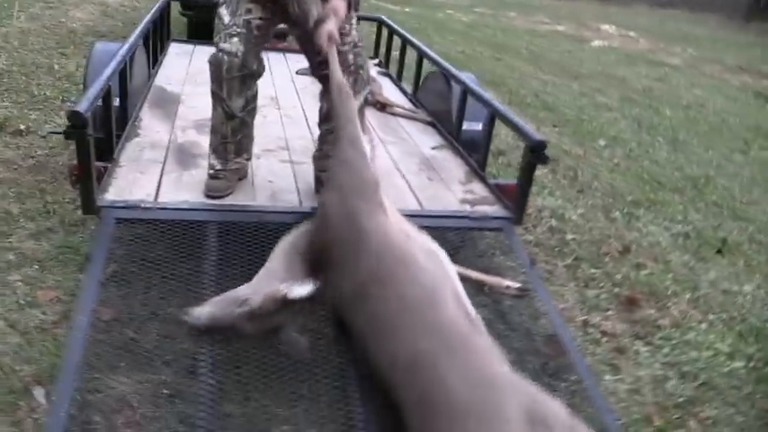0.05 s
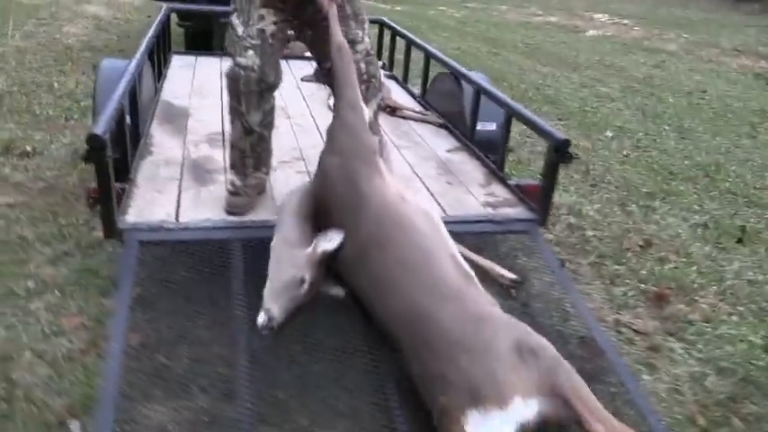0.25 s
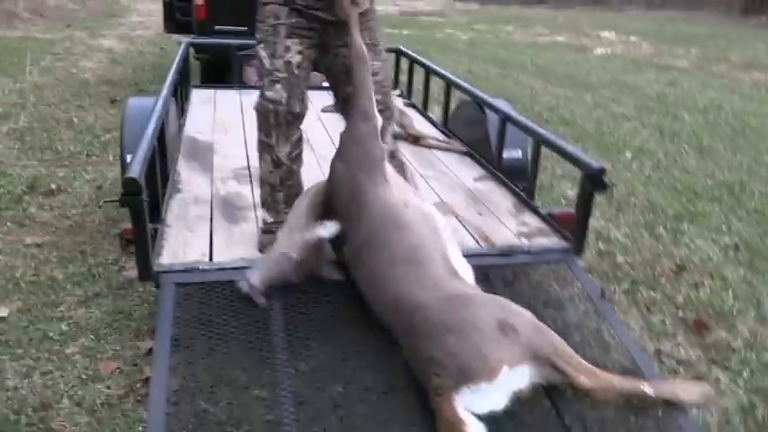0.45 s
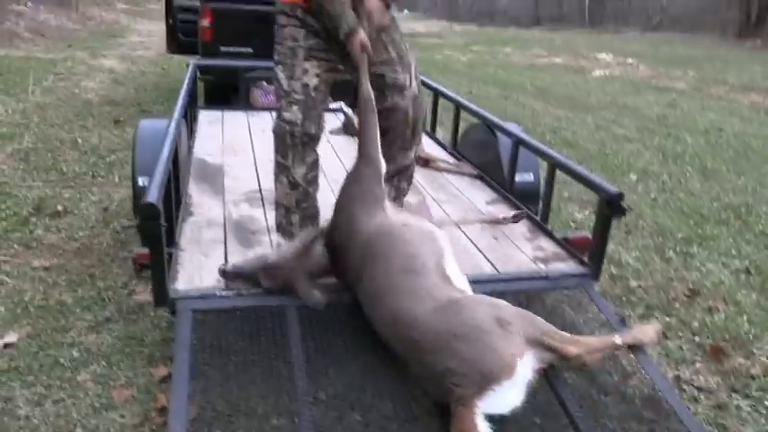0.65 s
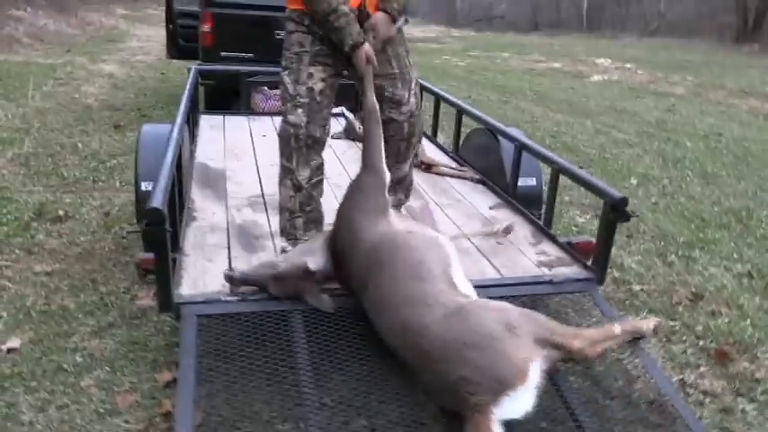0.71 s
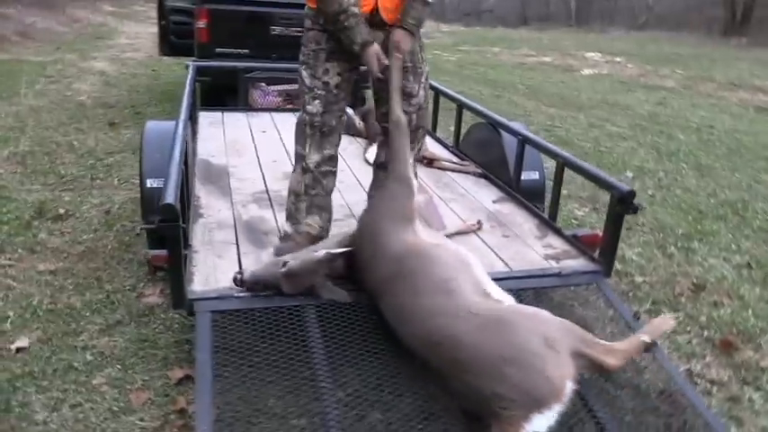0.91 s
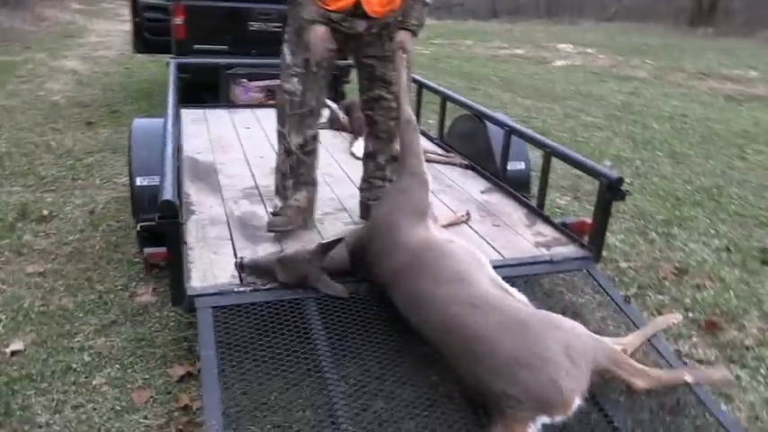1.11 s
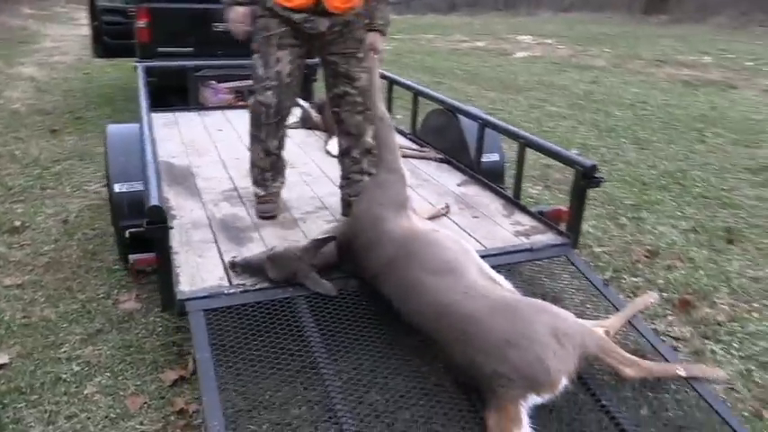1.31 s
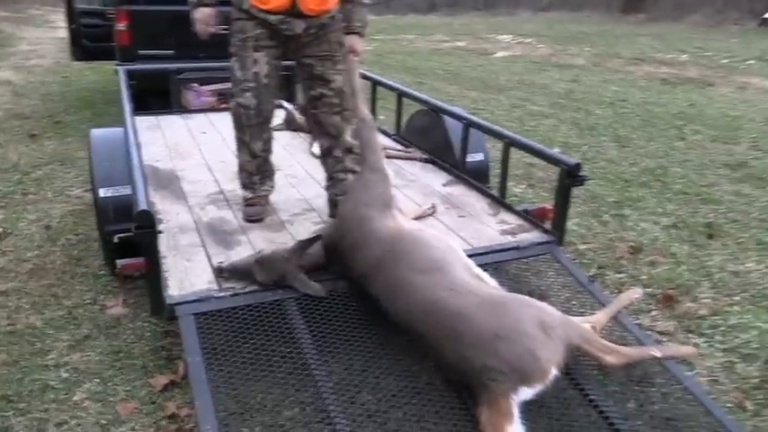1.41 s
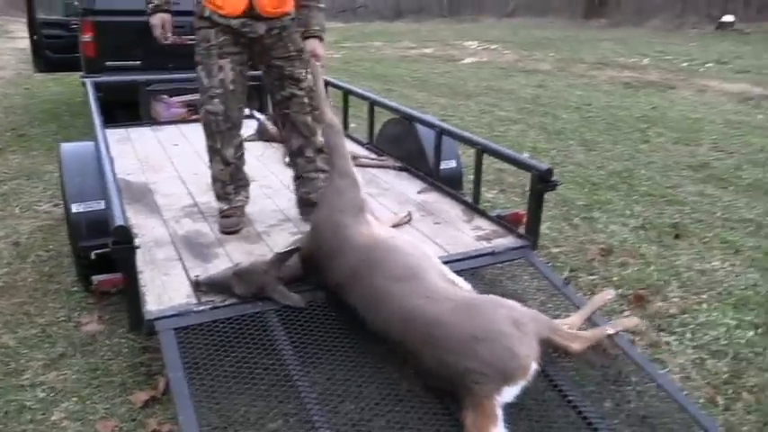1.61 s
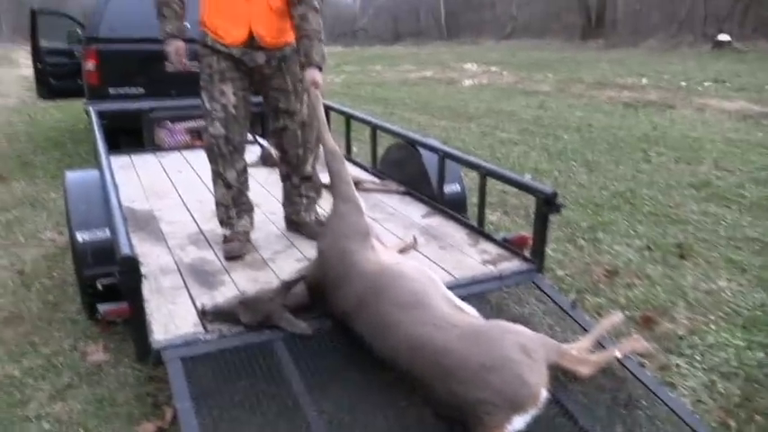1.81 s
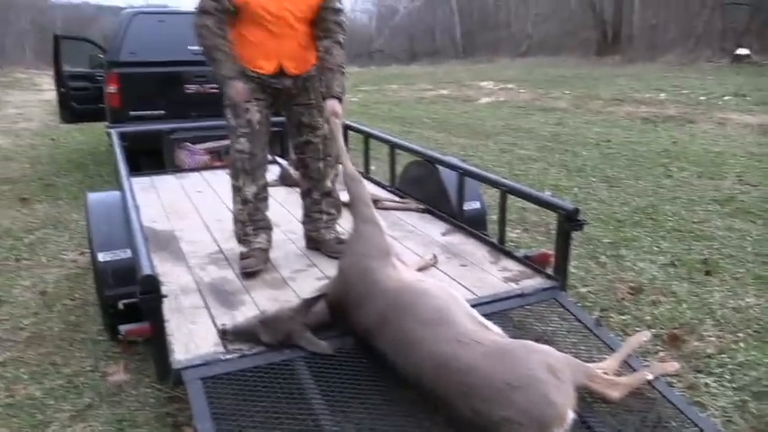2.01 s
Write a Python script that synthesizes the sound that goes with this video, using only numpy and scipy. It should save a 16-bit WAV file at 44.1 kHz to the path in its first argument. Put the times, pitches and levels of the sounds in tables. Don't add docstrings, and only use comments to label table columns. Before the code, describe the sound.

Heavy carcass scrapes up a steel mesh ramp and thumps onto a hollow wooden trailer deck

```python
import sys
import numpy as np
from scipy import signal
from scipy.fft import rfft, irfft
from scipy.io import wavfile
from scipy.ndimage import uniform_filter1d

SR = 44100
rng = np.random.default_rng(int(sys.argv[2]) if len(sys.argv) > 2 else 0)


def dump_mix(stems):
    frames = np.atleast_2d(stems).T
    limited = np.clip(frames, -1, 1)
    pcm = np.round(limited * 32767).astype(np.int16)
    wavfile.write(sys.argv[1], SR, pcm)


def linear_from_db(decibels):
    return 10 ** (np.asarray(decibels, float) / 20)


N = 92610


def unit(x):
    return x / np.sqrt(np.mean(x ** 2) + 1e-20)


def read(points, hz):
    f, value = np.transpose(points)
    return np.interp(np.log(hz + 1), np.log(f + 1), value)


def curve(table):
    s, db = np.transpose(table)
    return np.interp(np.arange(N) / SR, s, db)


def colour(x, spectrum):
    gain = linear_from_db(read(spectrum, np.fft.rfftfreq(len(x), 1 / SR)))
    return irfft(rfft(x) * gain, len(x))


def ring(x, hz, width_hz):
    r = np.exp(-np.pi * width_hz / SR)
    return 2 * signal.lfilter([1 - r], [1, -r * np.exp(2j * np.pi * hz / SR)], x).real


def soften(x, hz):
    return signal.sosfilt(signal.butter(4, min(hz, 20000), fs=SR, output="sos"), x)


def grit(per_s, spread_db):
    slips = rng.random(N) < per_s / SR
    size_db = spread_db * np.minimum(rng.exponential(1, N), 3)
    return unit(slips * linear_from_db(size_db) * rng.standard_normal(N))


def fading(size, spectrum, t60, share, order):
    overlap = order * 3 // 4
    f, t, z = signal.stft(rng.standard_normal(size), SR, nperseg=order, noverlap=overlap)
    fade_db = -60 * t / (share * read(t60, f)[:, None])
    z = z * linear_from_db(read(spectrum, f)[:, None] + fade_db)
    out = signal.istft(z, SR, nperseg=order, noverlap=overlap)[1][:size]
    return out / np.abs(out).max()


def add(mix, s, sound):
    part = mix[round(s * SR):][:len(sound)]
    part += sound[:len(part)]


# frequency in Hz, level in dB.
AIR_SPECTRUM = [(60, 20.5), (200, 4.5), (400, 1), (800, -25.5), (1600, -5), (3200, -26), (9000, -40),
                (16000, -25)]
# time in seconds, level in dB.
SWAY_LEVEL = [(0, -70), (.17, -56), (.22, -33), (.4, -29.5), (.5, -26.5), (.58, -37.5), (.72, -35.5),
              (.9, -47), (.97, -33.5), (1.05, -44), (1.3, -45.5), (1.45, -45), (1.52, -66), (1.6, -58),
              (1.7, -61), (1.9, -37), (2.1, -71)]
SWAY_MODES_HZ = [73, 114.7, 141.7]


def field():
    width_hz = 22.7
    hush, shake = rng.standard_normal((2, N))
    sway = unit(sum(ring(ring(shake, hz, width_hz), hz, width_hz) for hz in SWAY_MODES_HZ))
    return linear_from_db(-46) * unit(colour(hush, AIR_SPECTRUM)) + linear_from_db(curve(SWAY_LEVEL)) * sway


def catches():
    catch_db, catch_s = 2.5, 0.0053
    t = np.arange(N) / SR
    swell = sum((t > s) * np.exp(-abs(t - s) / catch_s) for s, _, _ in TICKS)
    return linear_from_db(catch_db * np.minimum(swell, 1))


# frequency in Hz, level in dB.
CLOTH_SPECTRUM = [(150, -8), (500, 0.5), (900, -5), (1600, -4), (3200, -2), (5500, -1.5), (9000, -3),
                  (15000, -9.5)]
# time in seconds, level in dB, tilt in dB per octave.
CLOTH_MOVES = [(.62, -45.5, -2.5), (.85, -41, -4), (1.13, -44, -4), (1.195, -43, -1.5), (1.23, -45.5, -3.5),
               (1.275, -41.5, -3), (1.295, -52, -5.5), (1.33, -50.5, -5.5), (1.345, -46.5, -1.5),
               (1.47, -41.5, -2.5), (1.57, -44, -1.5), (1.615, -41, -5), (1.635, -44.5, -1.5),
               (1.655, -54.5, -4), (1.745, -56, -5.5), (1.751, -34.5, -6.5), (1.791, -50.5, -11),
               (1.92, -51.5, -6)]


def rustle():
    fibres_per_s, spread_db, patch_db = 12000, 2.5, 1.38
    crackle = grit(fibres_per_s, spread_db) + rng.standard_normal(N)
    f, t, z = signal.stft(unit(colour(crackle, CLOTH_SPECTRUM)), SR, nperseg=256)
    s, db, tilt_db = np.transpose(CLOTH_MOVES)
    octaves = np.log2((f[:, None] + 200) / 4000)
    level_db = np.interp(t, s, db, left=-99) + np.interp(t, s, tilt_db) * octaves
    patches = uniform_filter1d(rng.standard_normal(z.shape), 8, 0)
    patches = unit(uniform_filter1d(patches, 8, 1))
    cloth = signal.istft(z * linear_from_db(level_db + patch_db * patches), SR, nperseg=256)[1][:N]
    return np.sqrt(catches()) * cloth


# time in seconds, level in dB.
SCUFF_LEVEL = [(1.219, -73), (1.223, -47), (1.235, -54), (1.255, -40), (1.27, -43), (1.283, -46),
               (1.29, -75)]
# frequency in Hz, width in Hz, level in dB.
SOLE_MODES = [(2200, 170, 0), (3420, 400, 1), (4200, 560, -1), (5140, 400, -15)]


def scuff():
    slips = grit(per_s=4000, spread_db=1.8) + 0.89 * rng.standard_normal(N)
    sole = sum(linear_from_db(db) * unit(ring(slips, hz, width_hz)) for hz, width_hz, db in SOLE_MODES)
    return linear_from_db(curve(SCUFF_LEVEL)) * sole


# start in seconds, level in dB, pitch in Hz, t60 in seconds.
SOFT_THUDS = [(.204, -12, 183, 0.045), (0.497, -9, 259, 0.083), (0.755, -9, 158, 0.22),
              (0.764, -6, 350, 0.12), (0.788, -18.5, 421, 0.078), (1.2199, -14, 242.3, 0.074),
              (0.642, -41, 294, 0.029), (1.391, -12, 165, 0.028), (1.747, -19.5, 133, 0.17),
              (1.821, -15, 120, 0.077)]


def thud(s, db, hz, t60_s):
    attack_s, sag_s, longest_t60_s = 0.0033, 0.0055, 0.14
    t = np.arange(SR // 4) / SR
    turn = 2 * np.pi * hz * (t + 0.0018 * (1 - np.exp(-t / sag_s)))
    fade_db = -60 * t / min(t60_s, longest_t60_s)
    tone = np.sin(turn) + 0.38 * np.sin(1.1 * turn)
    return s, linear_from_db(db + fade_db) * np.minimum(t / attack_s, 1) * tone


# start in seconds, level in dB, pitch in Hz, t60 in seconds.
PLANK_KNOCKS = [(.4965, -7, 399, 0.027), (.505, -7, 413, 0.038), (.513, -14.5, 436, 0.038),
                (0.6403, -6, 346.4, 0.07), (.6405, -14.5, 676, 0.056), (.648, -8.5, 500, 0.054),
                (0.6552, -4, 335, 0.024), (.655, -14, 670, 0.083), (0.6611, -16, 370, 0.015),
                (.665, -2, 500, 0.017), (0.831, -26.5, 144, 0.47), (.925, -36.5, 1600, 0.089),
                (1.285, -32, 508, 0.23), (0.519, -19.5, 200, 0.13), (0.557, -21.5, 1350, 0.021),
                (0.693, -12, 337, .04), (.704, -17, 380, 0.026), (0.762, -0.5, 498, 0.037),
                (0.7657, -1.5, 410, 0.023), (.784, -4.5, 386, 0.054), (.793, -1, 477, 0.04),
                (.808, -7.5, 390, 0.049), (0.816, -14, 377, 0.03), (1.2209, -8.5, 410, 0.021),
                (1.2215, -17.5, 631, 0.042), (1.226, -15, 462, 0.047), (1.234, -18.5, 323, 0.056),
                (1.252, -25, 470, 0.033), (1.265, -22, 440, 0.072), (1.7468, -5.5, 429, 0.033),
                (1.754, -4, 566, 0.099), (1.7601, -2.5, 584, 0.039), (1.770, -6, 401, 0.073),
                (1.79, -24.5, 786, 0.085), (1.82, -18.5, 650, 0.041)]


def knock(s, db, hz, t60_s):
    attack_s = 0.0013
    t = np.arange(SR // 3) / SR
    return s, -linear_from_db(db - 60 * t / t60_s) * np.minimum(t / attack_s, 1) * np.sin(2 * np.pi * hz * t)


# start in seconds, level in dB, ring in
# Hz.
TICKS = [(0.236, -19, 4160), (0.272, -40, 6800), (0.2843, -13.5, 4000), (0.3007, -18, 4500),
         (0.3065, -26, 4630), (0.3237, -14.5, 4080), (0.3672, -16.5, 6500), (0.371, -12, 4100),
         (0.3774, -17.5, 4000), (0.3944, -15, 4340), (0.432, -26, 4120), (0.5575, -33, 3000),
         (0.641, -29.5, 3400), (0.6846, -32, 4030), (0.719, -27.5, 3670), (0.7528, -14.5, 3630),
         (0.7655, -29, 14500), (0.7755, -30, 14500), (0.8635, -34.5, 5670), (1.4685, -27, 5600),
         (1.4996, -31, 6350), (1.5245, -30, 4450), (1.223, -35, 5270), (1.46, -35, 6260),
         (1.595, -31, 5950), (1.605, -36, 4600), (1.6168, -29, 5600)]
# frequency in Hz, level in dB.
SNAP_SPECTRUM = [(1500, -22), (4000, -9), (5500, -12), (7000, 0), (9000, -2), (11000, -12), (14000, -20)]


def tick(s, db, hz):
    snap_t60_s, ring_t60_s, ring_db, lead = 0.009, 0.025, -6, 56
    t = np.arange(1500) / SR
    hit = rng.standard_normal(len(t))
    snap = colour(np.roll(hit * linear_from_db(-60 * t / snap_t60_s), lead + 8), SNAP_SPECTRUM)
    snap = np.roll(snap, -8)
    bar = ring(np.roll(hit * linear_from_db(-60 * t / ring_t60_s), lead), hz, width_hz=450)
    sound = unit(snap) + linear_from_db(ring_db) * 2 * unit(bar)
    return s - lead / SR, linear_from_db(db) * sound / np.abs(sound).max()


# frequency in Hz, level in dB, t60 in seconds.
DECK_MODES = [(79, -43.5, 0.1), (128.5, 2.5, 0.36), (153, -5, .22), (225.7, 1.5, 0.34), (259, 0.5, 0.55),
              (264, -21, 0.067), (350, 6.5, 0.21), (418, 7, 0.16), (460.2, 2.5, 0.25), (513, -0.5, 0.19),
              (581, -9, 0.78), (590, -41, 0.065), (666, -30, 0.048), (810, -38, 0.34)]
# frequency in Hz, level in dB.
PLANK_SPECTRUM = [(50, -41), (150, 6), (300, -3.5), (500, 11), (700, -2), (1000, 2), (2000, -40),
                  (5000, -62)]
# frequency in Hz, t60 in seconds.
PLANK_DECAY = [(60, 0.067), (300, 0.37), (700, 0.14), (1500, 0.052), (4000, 0.085)]
# frequency in Hz, level in dB.
HUM_SPECTRUM = [(80, -0.5), (150, 13.5), (350, 6.5), (550, -2.5), (800, 5), (1500, -52), (3000, -54)]
# frequency in Hz, t60 in seconds.
HUM_DECAY = [(150, 0.48), (400, 0.81), (900, 0.35)]


def deck_ring(share):
    spread_db, detune, plank_db, hum_db = 0.5, 0.0284, -7, -14.5
    t = np.arange(SR // 2) / SR
    hz, db, t60_s = np.transpose(DECK_MODES)[:, :, None]
    spot = rng.standard_normal((2, len(DECK_MODES), 1))
    level = linear_from_db(db + spread_db * spot[0] - 60 * t / (share * t60_s))
    modes = (level * np.sin(2 * np.pi * hz * (1 + detune * spot[1]) * t)).sum(0)
    planks = fading(len(t), PLANK_SPECTRUM, PLANK_DECAY, share + 0.78, order=512)
    hum = fading(len(t), HUM_SPECTRUM, HUM_DECAY, 0.86, order=1024)
    return modes / np.abs(modes).max() + linear_from_db(plank_db) * planks + linear_from_db(hum_db) * hum


# time in seconds, scrape level in dB.
DRAG_SPEED = [(0.0, -51.5), (0.208, -34.5), (0.296, -26), (0.406, -27), (0.524, -42), (0.564, -45.5),
              (0.582, -44.5), (0.63, -56.5)]
# frequency in Hz, level in dB.
SCRAPE_SPECTRUM = [(50, -30), (100, -16), (250, -8), (450, -5.5), (900, -8), (1600, -9), (3000, -18.5),
                   (8000, -67)]
# frequency in Hz, width in Hz, level in dB.
BAR_MODES = [(1000, 70, -6), (1320, 72, -18), (1710, 130, -7.5), (4200, 250, -2), (6900, 560, -48)]
# frequency in Hz, level in dB.
HIDE_SPECTRUM = [(300, -28), (900, -10.5), (3200, -3), (5500, -5.5), (9000, -9), (15000, -19)]


def drag():
    slips_per_s, bumps_per_s, spread_db = 4000, 150, 2.5
    scrape_db, bars_db, jolt_db, hiss_db = 3, -8, 2.5, -23.5
    hiss_share = 0.31
    speed_db = curve(DRAG_SPEED)
    moving = np.clip((0.665 - np.arange(N) / SR) / 0.013, 0, 1)
    speed = linear_from_db(speed_db) * moving
    slips = grit(slips_per_s, spread_db) + rng.standard_normal(N)
    scrape = unit(colour(slips, SCRAPE_SPECTRUM))
    bars = sum(linear_from_db(db) * unit(ring(slips, hz, width_hz)) for hz, width_hz, db in BAR_MODES)
    bumps = speed * grit(bumps_per_s, spread_db)
    jolts = signal.fftconvolve(bumps, unit(deck_ring(0.51)))[:N] / np.sqrt(SR / 2)
    hiss = linear_from_db(hiss_db + hiss_share * speed_db) * moving * catches()
    hiss = hiss * unit(colour(slips[::-1], HIDE_SPECTRUM))
    return hiss + speed * (linear_from_db(scrape_db) * scrape + linear_from_db(bars_db) * bars) + linear_from_db(jolt_db) * jolts


# frequency in Hz, t60 in seconds.
CRACK_DECAY = [(500, 0.34), (2000, 0.12), (5000, 0.056), (14000, 0.015)]
# frequency in Hz, width in Hz, level in dB.
RAIL_MODES = [(994, 41, -21), (1274, 110, -8), (1600, 57, 2), (1740, 180, -0.5), (2810, 210, -0.5),
              (3400, 380, -7)]
# start in seconds, level in dB, crack level in dB,
# upper edge of the crack in Hz, ring length as a share.
DECK_BLOWS = [(0.361, -10.5, -20, 2000, 0.21), (0.496, -10.5, -39, 1000, 0.47),
              (.514, -16, -40, 1010, 0.64), (0.536, -22.5, -28.5, 1470, 1), (0.6401, -11, -17, 1500, 0.15),
              (0.656, -21, -24, 2000, 0.095), (0.706, -15, -55, 900, 0.76), (0.7495, -7, -5.5, 12000, 1),
              (.762, -9, -26, 2000, 0.22), (.785, -11, -38, 1200, 0.15), (0.814, -19.5, -48, 710, 0.99),
              (1.2201, -18.5, -38, 1200, 0.43), (1.243, -21, -53, 1200, 0.92),
              (1.391, -29.5, -55, 900, 0.36), (1.553, -34, -39, 1480, 0.56), (1.7473, -6, -22, 1220, 0.11),
              (1.756, -10.5, -34.5, 5960, 0.75)]


def blow(s, db, crack_db, edge_hz, share):
    contact_s, rumple, soft_hz, low_hz, rails_db = 0.0051, 0.097, 2200, 160, -2
    t = np.arange(SR // 8) / SR
    push = rng.standard_normal(len(t)) * np.exp(-t / contact_s) * rumple
    push[0] = 1
    body = soften(signal.fftconvolve(deck_ring(max(share, 0.1)), push), soft_hz)
    body = signal.sosfilt(signal.butter(2, low_hz, "high", fs=SR, output="sos"), body)
    out = linear_from_db(db) * body / np.abs(body).max()
    shape = [(300, -14), (900, -7), (edge_hz, -5), (edge_hz * 3, -24)]  # Hz, dB
    crack = soften(fading(len(t), shape, CRACK_DECAY, 0.67, order=128), 2 * edge_hz)
    rails = sum(linear_from_db(rail_db) * ring(crack, hz, width_hz) for hz, width_hz, rail_db in RAIL_MODES)
    out[:len(t)] += linear_from_db(crack_db) * (crack + linear_from_db(rails_db) * rails / np.abs(rails).max())
    return s, out


def scene():
    mix = field() + rustle() + scuff() + drag()
    for source, rows in [(thud, SOFT_THUDS), (knock, PLANK_KNOCKS), (tick, TICKS), (blow, DECK_BLOWS)]:
        for row in rows:
            add(mix, *source(*row))
    return np.array([mix, mix])


def low_pass(x):
    return signal.sosfilt(signal.butter(12, 16740, fs=SR, output="sos"), x)


def record(dry):
    low_hz, edge_hz, limit_db, left_dip_db, dip_s = 73.4, 16100, -16, 1.8, 0.06
    dry = signal.sosfilt(signal.butter(2, low_hz, "high", fs=SR, output="sos"), dry)
    rate = 1 / (dip_s * SR)
    power_db = 10 * np.log10(signal.lfilter([rate], [1, rate - 1], dry[0] ** 2) + 1e-12)
    dip_db = left_dip_db * np.clip((power_db - limit_db) / 3, 0, 1)
    mix = np.tanh(dry * np.array([linear_from_db(-dip_db), np.ones(N)]) / 1.39) * 1.312
    mix = signal.oaconvolve(mix, signal.firwin(255, edge_hz, fs=SR)[None], "same")
    return low_pass(mix)


dry = scene()
out = record(dry)
dump_mix(out)
```